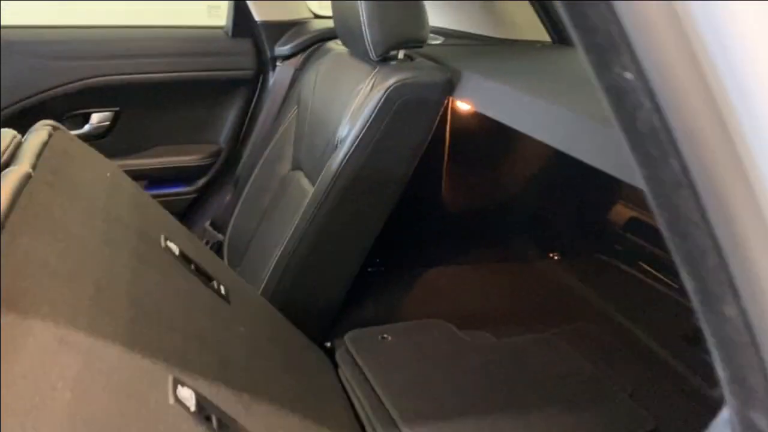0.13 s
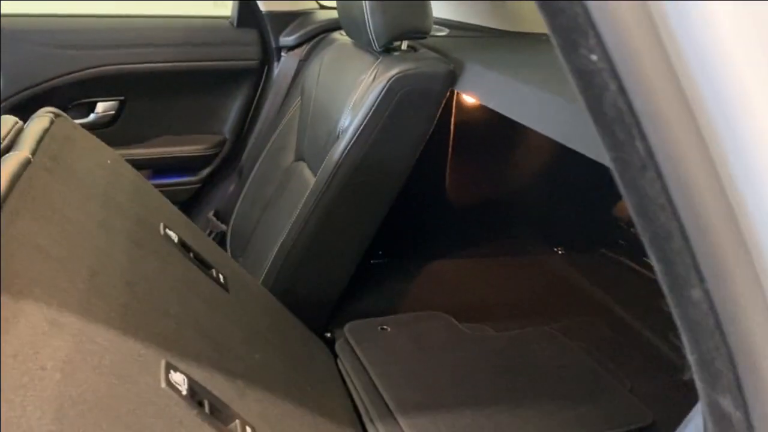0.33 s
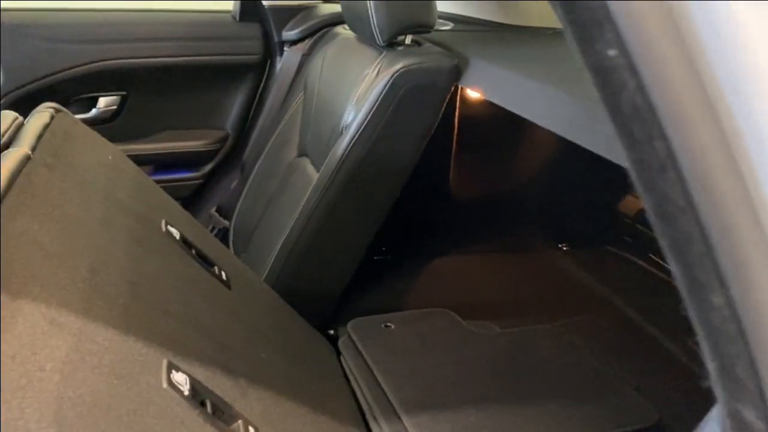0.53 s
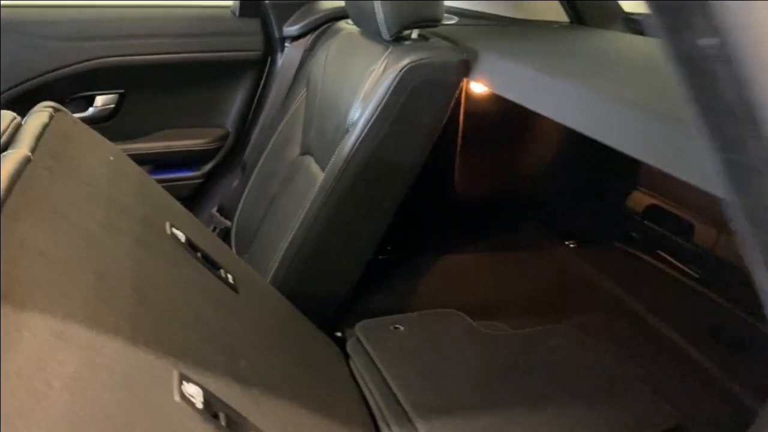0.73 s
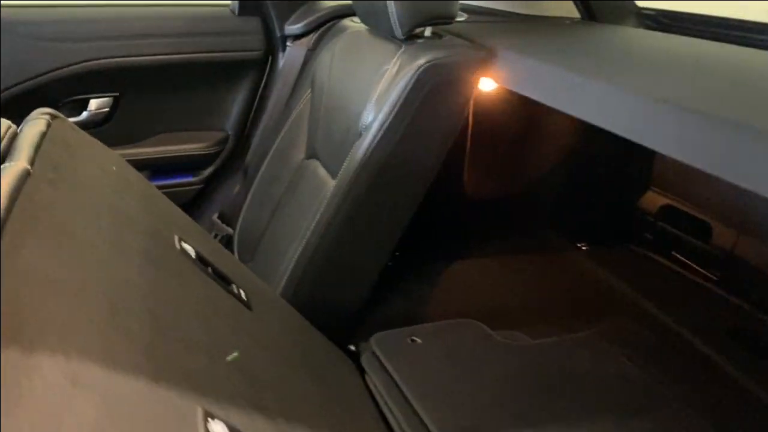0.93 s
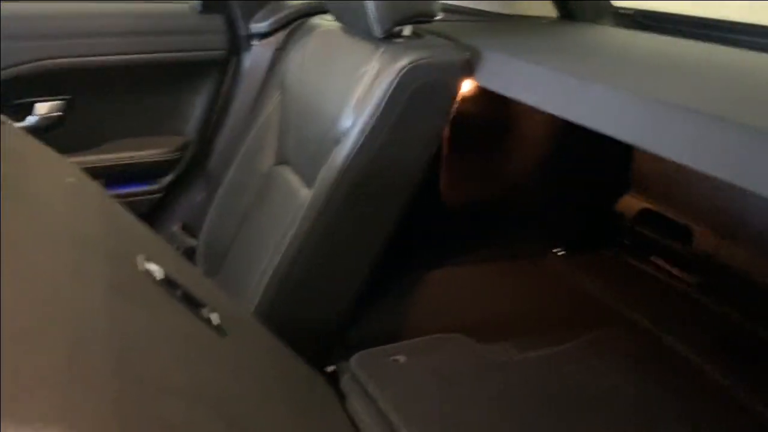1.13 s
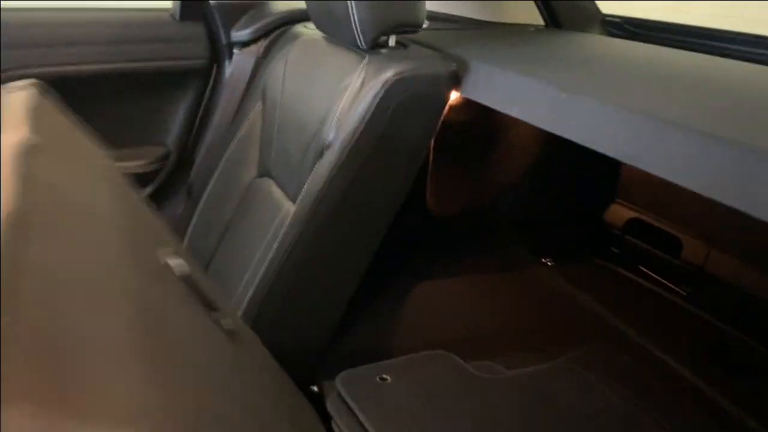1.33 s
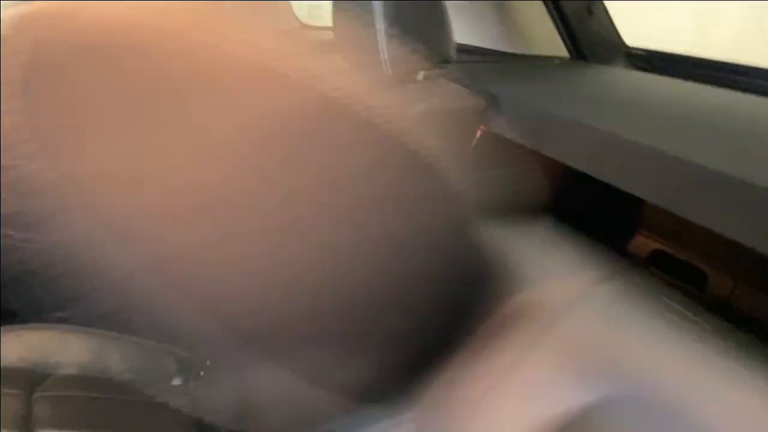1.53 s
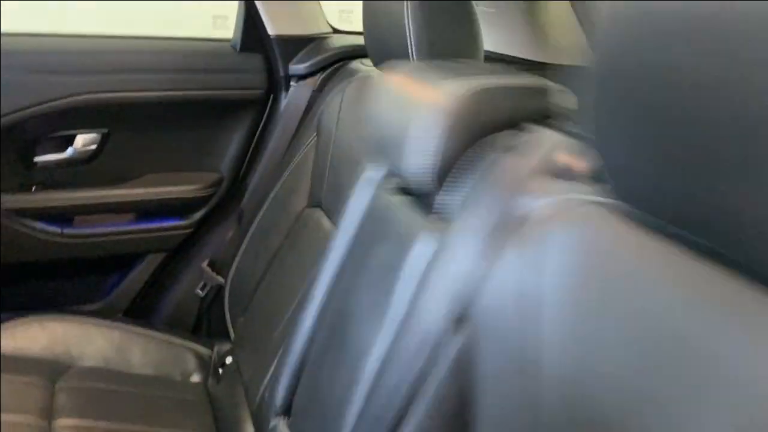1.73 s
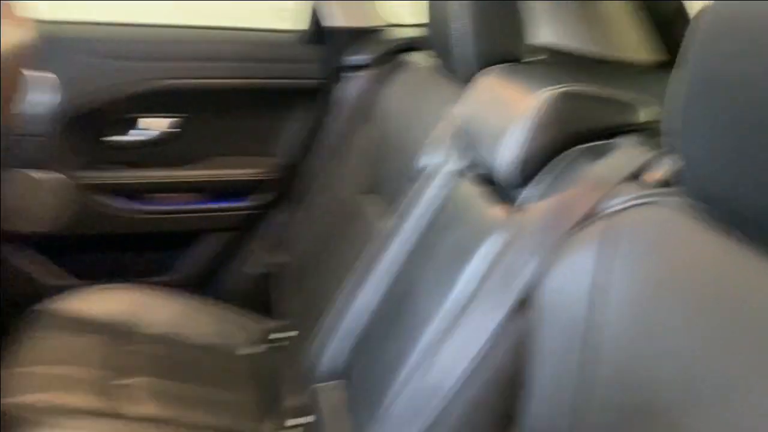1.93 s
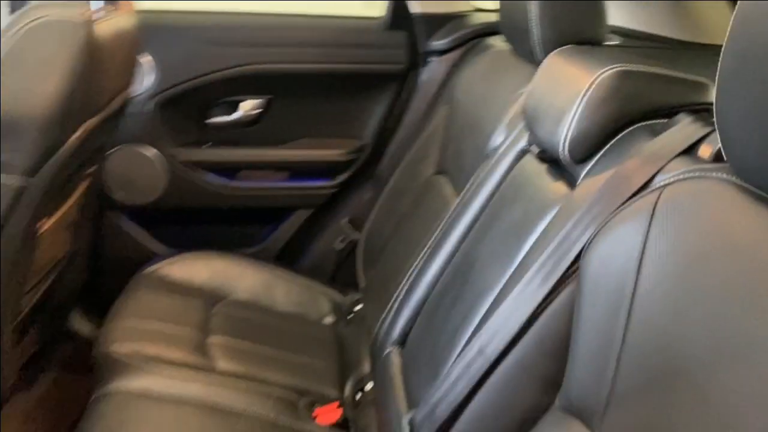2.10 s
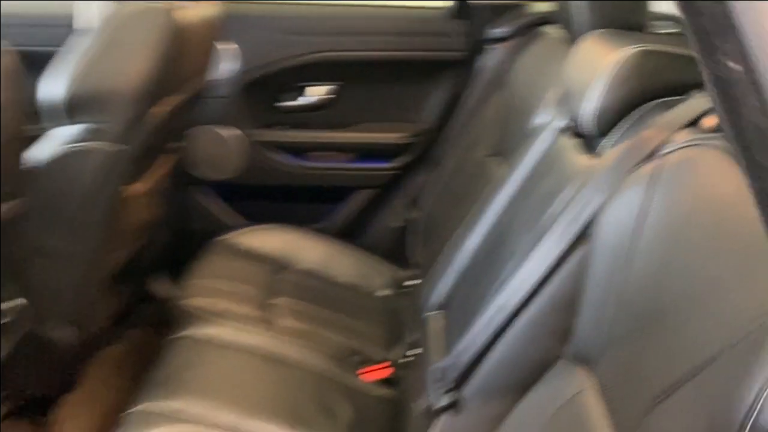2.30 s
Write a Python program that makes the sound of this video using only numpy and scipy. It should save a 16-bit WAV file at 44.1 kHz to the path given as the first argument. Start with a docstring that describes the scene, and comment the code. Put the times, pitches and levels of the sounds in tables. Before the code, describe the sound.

A padded car seatback thuds home as its metal latch snaps with a sharp clack, after faint rustles and a hand sliding on upholstery; close mono microphone, reverberant hall with steady hum and airy hiss.

```python
"""In a hall where machinery hums over a wash of air noise, a parked car stands open. A rustle dies away, a hand
slides on the upholstery as shaped friction noise, and the seatback swings up. Its latch chatters onto the
striker as dense clicks ringing metal modes; the padded frame thuds home as soft pushes ringing seat and body.
The latch rebounds in light ringing taps, and sparse decaying reflections carry the tail through the hall."""
import sys
import numpy as np
from scipy import signal
from scipy.fft import rfft, irfft
from scipy.io import wavfile
from scipy.ndimage import uniform_filter1d

SR = 44100
rng = np.random.default_rng(int(sys.argv[2]) if len(sys.argv) > 2 else 0)


def invert_db(x):
    """Field ratio 10**(x/20) for x, a level in decibels (scalar or array-like)."""
    u = np.asarray(x, float) / 20
    return 10 ** u


def transcribe(signal):
    """Save signal, clipped to [-1, 1], as a 16-bit WAV file at the path in sys.argv[1]."""
    frames = np.atleast_2d(signal).T
    limited = np.clip(frames, -1, 1)
    pcm = np.round(limited * 32767).astype(np.int16)
    wavfile.write(sys.argv[1], SR, pcm)


N = 104076  # length in samples

# Latch meeting the striker: (time [s], ring level [dB], chatter length [s], tilt [dB per octave], low-pass [Hz])
LATCH_CONTACTS = [(1.7565, -18, 0.0029, -4.5, 5800), (1.759, -17, .009, 1, 7000),
                  (1.7703, -13.5, 0.0076, 1, 15000), (1.778, -18.5, 0.0097, 1, 11500),
                  (1.796, -24.5, 0.017, -0.8, 5000), (1.808, -33, 0.0045, 1, 9000)]
# Latch and frame modes: (frequency [Hz], level before tilt [dB], t60 [s])
LATCH_MODES = [(660, -11, .06), (775, -3, .06), (890, -8, .04), (1100, -7, .02), (1380, 0, .035),
               (1735, -2, .04), (1965, -6, .03), (2400, -4, .02), (3130, -10, .012), (3840, -8, .015),
               (4770, -10, .01), (5660, -12, .012), (6870, -8, .012), (8000, -14, .01)]
# Spectrum of the crack on each contact, before tilt: (frequency [Hz], relative level [dB per Hz])
CRACK_SPECTRUM = [(250, -40), (550, -13), (1000, -4.5), (2450, -12), (4250, -13), (7010, -19),
                  (14600, -38.5), (16100, -56)]
CRACK_DB = 1  # against the ring
CHATTER_PER_S, CHATTER_SPREAD_DB = 4000, 4
ATTACK_SHARE = 0.16  # rise time as a share of the chatter length

# Light taps of the pawl: (time [s], level [dB], chatter length [s], ring frequency [Hz])
PAWL_TAPS = [(1.759, -14.5, 0.0073, 2405), (1.796, -23.5, 0.012, 2350), (1.853, -35, 0.011, 2360),
             (1.916, -40, 0.0064, 2380), (1.94, -45.5, 0.0037, 2650), (2.298, -48.5, 0.0098, 1330)]
PAWL_T60_S = 0.02

# Blows of the padded frame: (time [s], gain [dB], contact time [s])
FRAME_BLOWS = [(1.7655, -16, 0.0017), (1.7745, -12, 0.0018), (1.785, -13, .004), (1.798, -12, 0.0048),
               (1.811, -20.5, 0.0016)]
# Seat and body modes: (frequency [Hz], level [dB], t60 [s])
BODY_MODES = [(59, -16, .3), (67.3, -16.5, 1.07), (76, 3.5, .09), (90.4, -14.5, 0.72), (103.6, -19.5, 0.54),
              (125, -7.5, 0.13), (146, -15.5, .7), (164.8, -22, 1.1), (203, 0, 0.069), (227.7, -12, 0.48),
              (286, -12, 0.25), (325, -4, 0.11), (372, -3.5, 0.3), (416, 6.5, 0.074)]

# Slide of a hand and the swing:
# (start [s], swell time [s], stop time [s], level at full swell [dB], tilt [dB per octave])
CLOTH_SLIDES = [(1.1, 0.146, 0.024, -40, -0.7), (1.55, 0.253, 0.012, -44, -.7)]
# Spectrum of the slides, before tilt: (frequency [Hz], relative level [dB per Hz])
CLOTH_SPECTRUM = [(350, -33), (600, -19), (698, -15), (1370, -20.5), (1570, -8), (2220, -3.5), (3090, -11),
                  (3750, -4), (7990, -9), (16100, -32.5)]
# Spectrum of the opening rustle: (frequency [Hz], relative level [dB per Hz])
RUSTLE_SPECTRUM = [(350, -9), (600, -4.5), (1160, -22), (1670, -11.5), (1920, -17), (2160, -11),
                   (2560, -23), (3000, -8), (3500, -16), (3900, -10.5), (4300, -20.5), (4800, -8),
                   (5420, -25), (7650, -25.5), (14000, -51)]
RUSTLE_DB, RUSTLE_STOP_S = -39, 0.075

# Dying time of the hall by band: (frequency [Hz], t60 [s])
HALL_T60 = [(60, 1.1), (150, 1.6), (300, 1.35), (700, 0.91), (1500, 0.44), (3000, 0.46), (6000, 0.15),
            (12000, 0.22)]
# Level of the hall by band: (frequency [Hz], level [dB])
HALL_TONE = [(60, -5.5), (150, 1), (300, -1), (550, -2), (900, -1.5), (1500, -9.5), (2400, -7.5),
             (3800, -1.5), (6000, -14), (12000, -2)]
HALL_DB = -5.5

# Spectrum of the air noise: (frequency [Hz], relative level [dB per Hz])
AIR_SPECTRUM = [(25, -42), (47, -11), (60, -35), (85, -5), (110, -8.5), (150, -7), (200, -15.5),
                (256, -11.5), (355, -21), (465, -14), (578, -21.5), (1200, -24.5), (1400, -22.5),
                (1700, -27), (2200, -24.5), (2750, -28), (3300, -25.5), (3900, -24.5), (4600, -29.5),
                (5800, -33), (7000, -32.5), (8000, -33), (8400, -38.5), (11000, -44.5), (13700, -52.5),
                (16100, -63)]
# Treble drift of the air noise, in full above 2 kHz: (time [s], level change [dB])
AIR_DRIFT = [(0, 1), (.5, 0), (1.0, -0.5), (1.5, -0.5), (2.0, -1), (2.36, -3)]
AIR_DB, PATCHY_DB = -45.5, 1.36  # rms above 500 Hz; rms of the patches

# Machine hum: (time [s], rms level [dB])
HUM_LEVEL = [(0, -38), (.1, -39.5), (.66, -40.5), (.99, -36), (1.16, -40), (1.66, -38), (2.03, -35.5),
             (2.36, -39)]
HUM_HZ, HUM_WAVER_DB = 417.1, 0.5
# Low drone of the machinery: (time [s], rms level [dB])
DRONE_LEVEL = [(0.0, -41), (0.036, -44), (0.852, -45), (0.922, -54), (0.994, -43), (1.396, -50.5),
               (1.424, -54), (1.576, -43), (1.7, -46)]
DRONE_HZ, DRONE_WAVER_DB = 68.2, 0.5
# Fuzzy tones in the air noise: (frequency [Hz], width at half amplitude [Hz], rms level [dB])
FUZZY_TONES = [(1419, 46, -58.5), (2152, 40, -69.5)]

# Gain control
DUCK_FROM_DB, DUCK_SHARE, RECOVER_DB_PER_S = -15, 0.13, 6.5  # share: dB of cut per dB above threshold
# Microphone: peak rounding (full scale = 1) and band edges
CEILING, MIC_LOW_HZ, MIC_HIGH_HZ = 0.79, 52, 16250


def contact(start, db, length, tilt_db, top_hz):
    """Chatter rings the latch modes, a wide crack rides on it, and a low-pass sets how dull the contact is."""
    clicks, envelope = chatter(length)
    sound = peaked(signal.fftconvolve(clicks, ring(LATCH_MODES, tilt_db)[:SR // 8]))
    crack = evened(coloured(rng.standard_normal(2048), CRACK_SPECTRUM, tilt_db))
    add(sound, 0, invert_db(CRACK_DB) * envelope * crack)
    low_pass = signal.butter(4, top_hz, fs=SR, output="sos")
    return start, invert_db(db) * signal.sosfilt(low_pass, sound)


def rebound(start, db, length, hz):
    """A light chattering tap rings a single mode of one small part."""
    clicks, _ = chatter(length)
    pawl = ring([(hz, 0, PAWL_T60_S)])[:SR // 8]
    return start, invert_db(db) * peaked(signal.fftconvolve(clicks, pawl))


def chatter(length):
    """A short dense run of tiny impacts of random size and sign, and its envelope."""
    t = np.arange(2048) / SR
    hit = rng.random(2048) < CHATTER_PER_S / SR
    size_db = CHATTER_SPREAD_DB * np.minimum(rng.exponential(1, 2048), 3)
    sign = rng.choice([-1, 1], 2048)
    envelope = np.minimum(t / (ATTACK_SHARE * length), 1) * np.exp(-(t / length) ** 2)
    return envelope * hit * sign * invert_db(size_db), envelope


def blow(start, db, contact_s):
    """A soft half-sine push of the cushion rings the seat and body; longer contact gives a darker thud."""
    push = np.sin(np.pi * np.arange(0, contact_s, 1 / SR) / contact_s)
    return start, invert_db(db) * signal.fftconvolve(push / push.sum(), ring(BODY_MODES))


def slide(start, swell, stop, db, tilt_db, spectrum):
    """Grainy friction hiss swells with the stroke, then falls away over the stop time."""
    t = np.arange(SR // 2) / SR
    grain_db = 0.8 * evened(uniform_filter1d(rng.standard_normal(len(t)), size=60))
    grain = rng.standard_normal(len(t)) * invert_db(grain_db)
    rise = (t / swell) ** 0.85
    fall = np.exp(-((t - swell) / stop) ** 2)
    envelope = np.where(t < swell, rise, fall)
    return start, invert_db(db) * envelope * evened(coloured(grain, spectrum, tilt_db))


def rustle():
    """Friction hiss that is at its fullest as the scene opens and dies away."""
    return slide(-0.03, 0.03, RUSTLE_STOP_S, RUSTLE_DB, 0, RUSTLE_SPECTRUM)


def hall(x):
    """Sparse reflections of random sign, each band with its own level and speed of dying."""
    first, spacing = 600, 20  # samples
    taps = np.zeros(SR)
    grid = np.arange(first, SR - spacing, spacing)
    at = grid + rng.integers(0, spacing, grid.shape)
    taps[at] = rng.choice([-1., 1.], at.shape)
    hz, t, z = signal.stft(taps, SR, nperseg=1024)
    t60 = read(HALL_T60, hz)[:, None]
    decay_db = read(HALL_TONE, hz)[:, None] - 60 * t / t60
    # divide out the summed energy of the taps, so that t60 leaves the band level alone
    z = z * invert_db(decay_db) / np.sqrt(t60 * (SR / spacing) / np.log(1e6))
    tail = signal.istft(z, SR, nperseg=1024)[1]
    tail[:first] = 0
    return signal.fftconvolve(x, tail)[:N]


def air():
    """Noise built from random short-time spectra, with faint drifting patches and a drifting treble."""
    frames, hz = N // 512 + 5, np.fft.rfftfreq(2048, 1 / SR)
    real, imaginary, patches = rng.standard_normal((frames, 1025, 3)).T
    patches = uniform_filter1d(patches, size=20, axis=0)  # smooth over frequency
    patches = evened(uniform_filter1d(patches, size=8, axis=1))  # and over time
    drift_db = np.interp(np.arange(frames) * 512 / SR, *np.transpose(AIR_DRIFT))
    drift_db = drift_db * np.clip(hz / 2000, 0, 1)[:, None]
    z = (real + 1j * imaginary) * invert_db(read(AIR_SPECTRUM, hz)[:, None] + PATCHY_DB * patches + drift_db)
    # raise the full-band level so that AIR_DB holds above 500 Hz
    full_to_upper = np.sqrt(np.sum(abs(z) ** 2) / np.sum(abs(z[hz > 500]) ** 2))
    noise = signal.istft(z, nperseg=2048, noverlap=1536)[1][:N]
    return invert_db(AIR_DB) * full_to_upper * evened(noise)


def machines():
    """Two clean sine tones that waver in level, and narrow bands of noise."""
    out = wavering_tone(HUM_HZ, HUM_LEVEL, HUM_WAVER_DB * wander(2.904, 30))
    out = out + wavering_tone(DRONE_HZ, DRONE_LEVEL, DRONE_WAVER_DB * wander(4.71, 13))
    f = np.fft.rfftfreq(N, 1 / SR)
    for hz, width, db in FUZZY_TONES:
        resonance = 1 / (1 + (2 * (f - hz) / width) ** 2)
        out = out + invert_db(db) * evened(irfft(rfft(rng.standard_normal(N)) * resonance, N))
    return out


def wavering_tone(hz, level, waver_db):
    """A sine whose rms level follows a table plus a random waver."""
    t = np.arange(N) / SR
    level_db = np.interp(t, *np.transpose(level)) + waver_db
    return np.sqrt(2) * invert_db(level_db) * np.sin(2 * np.pi * hz * t)


def wander(low_hz, high_hz):
    """Slow random drift of rms 1, summed from sines of random phase."""
    t = np.arange(N) / SR
    rates = np.geomspace(low_hz, high_hz, num=16)
    return evened(sum(np.sin(2 * np.pi * (f * t + rng.random())) / np.sqrt(f) for f in rates))


def ring(modes, tilt_db=0):
    """Impulse response of a set of decaying modes, tilted about 2 kHz."""
    t = np.arange(SR) / SR
    out = np.zeros(SR)
    for hz, db, t60 in modes:
        level_db = db + tilt_db * np.log2(hz / 2000) - 60 * t / t60
        out += invert_db(level_db) * np.sin(2 * np.pi * hz * t)
    return out


def coloured(x, points, tilt_db):
    """Filters a sound by a spectrum table, tilted about 2 kHz."""
    hz = np.fft.rfftfreq(len(x), 1 / SR)
    gain_db = read(points, hz) + tilt_db * np.log2((hz + 1) / 2000)
    return irfft(rfft(x) * invert_db(gain_db), len(x))


def read(points, hz):
    """Reads a table by frequency, in straight lines over log frequency."""
    f, value = np.transpose(points)
    return np.interp(np.log(hz + 1), np.log(f + 1), value)


def evened(x):
    """Scales a sound to rms 1."""
    return x / np.sqrt(np.mean(x ** 2) + 1e-20)


def peaked(x):
    """Scales a sound so that its loudest 200 samples have rms 1."""
    return x / np.sqrt(np.max(uniform_filter1d(x ** 2, size=200)) + 1e-20)


def add(mix, s, sound):
    """Lays a sound into the mix at s seconds, trimming what falls outside."""
    at = round(s * SR)
    sound = sound[max(-at, 0):]
    part = mix[max(at, 0):][:len(sound)]
    part += sound[:len(part)]


def scene():
    """Seat impacts with their hall tail, cloth close by, then air and machines behind."""
    seat, cloth = np.zeros(N), np.zeros(N)
    for table, source in ((LATCH_CONTACTS, contact), (PAWL_TAPS, rebound), (FRAME_BLOWS, blow)):
        for row in table:
            add(seat, *source(*row))
    for row in CLOTH_SLIDES:
        add(cloth, *slide(*row, CLOTH_SPECTRUM))
    add(cloth, *rustle())
    mix = seat + invert_db(HALL_DB) * hall(seat) + cloth + air() + machines()
    return mix[None]  # one channel


def band_limit(x):
    """A steep low-pass at the top of the band."""
    return signal.sosfilt(signal.butter(12, 16290, fs=SR, output="sos"), x)


def record(dry):
    """Gain control ducks loud moments and recovers slowly; peaks are rounded, deep bass and top treble cut."""
    # power of the last 800 samples
    power_db = 10 * np.log10(abs(uniform_filter1d(dry[0] ** 2, size=800, origin=399)) + 1e-12)
    cut_db = DUCK_SHARE * np.maximum(power_db - DUCK_FROM_DB, 0)
    # hold the deepest cut and let it recover at a steady rate
    recovery_db = np.arange(N) * RECOVER_DB_PER_S / SR
    cut_db = np.maximum.accumulate(cut_db + recovery_db) - recovery_db
    ducked = dry / invert_db(uniform_filter1d(cut_db, size=400))
    mic = CEILING * np.tanh(ducked / CEILING)
    mic = signal.sosfilt(signal.butter(4, MIC_LOW_HZ, "high", fs=SR, output="sos"), mic)
    mic = signal.oaconvolve(mic, signal.firwin(255, MIC_HIGH_HZ, fs=SR)[None], "same")
    return band_limit(mic)


dry = scene()
out = record(dry)
transcribe(out)
```